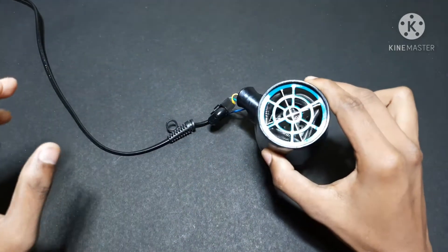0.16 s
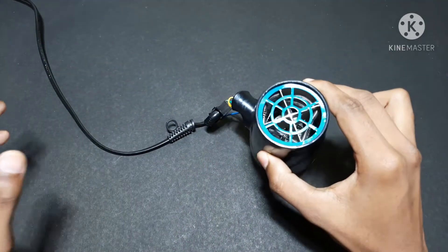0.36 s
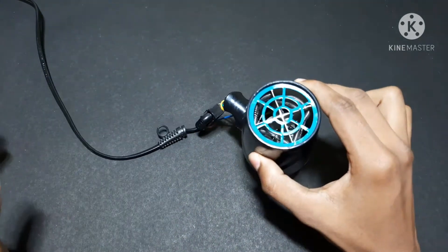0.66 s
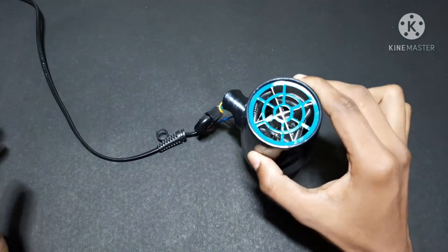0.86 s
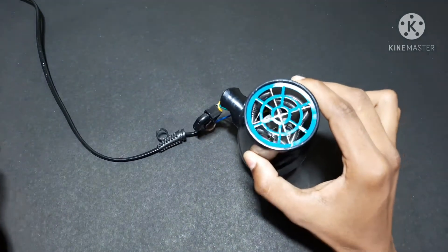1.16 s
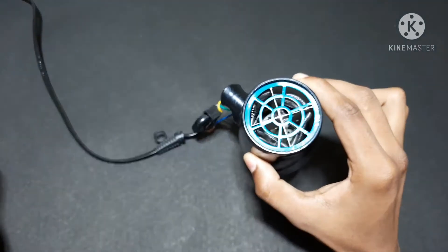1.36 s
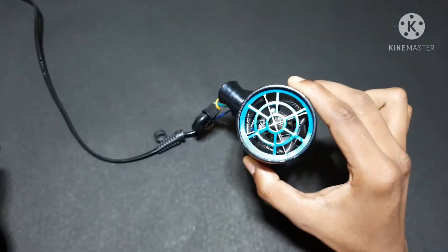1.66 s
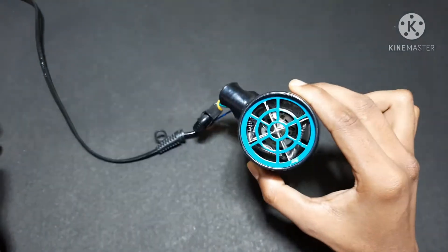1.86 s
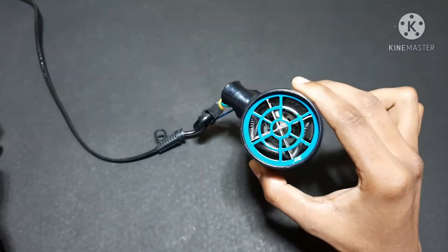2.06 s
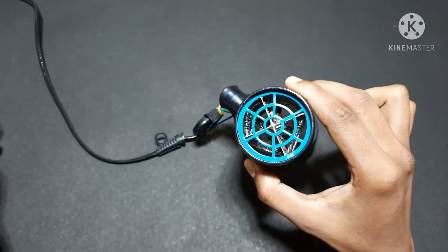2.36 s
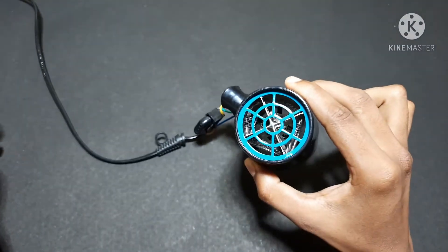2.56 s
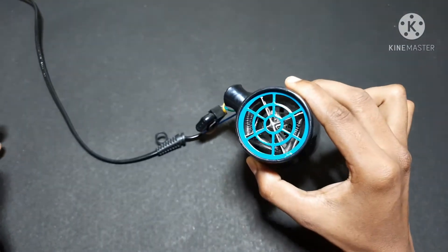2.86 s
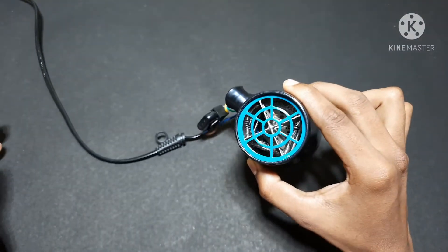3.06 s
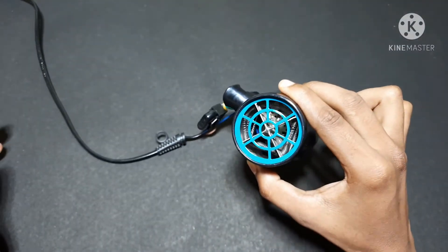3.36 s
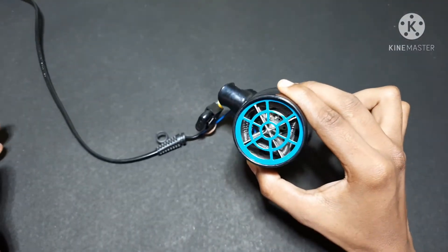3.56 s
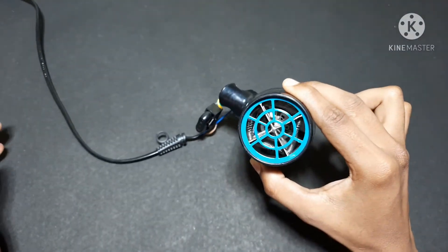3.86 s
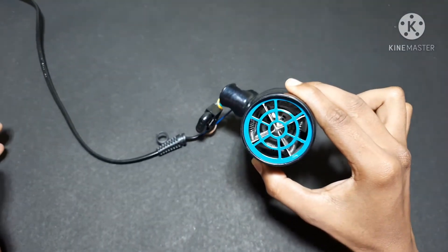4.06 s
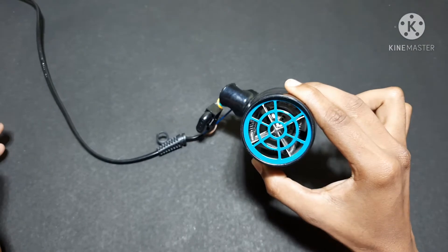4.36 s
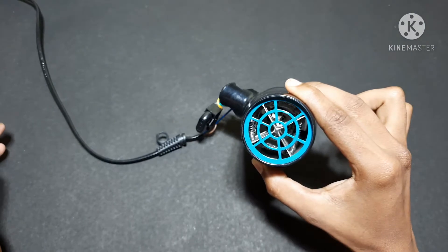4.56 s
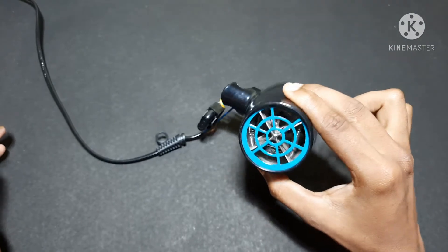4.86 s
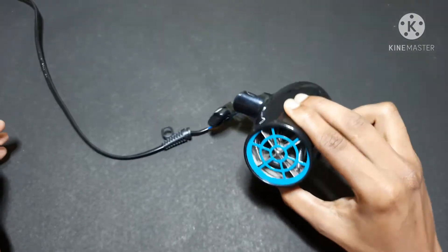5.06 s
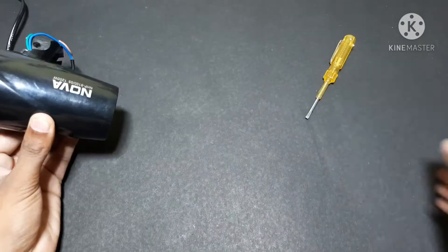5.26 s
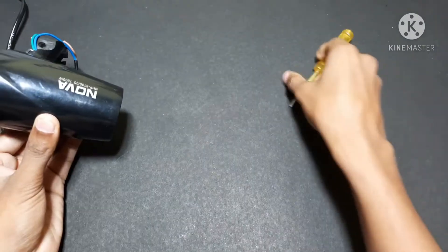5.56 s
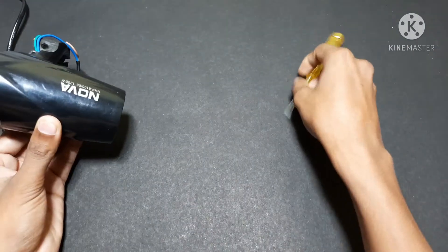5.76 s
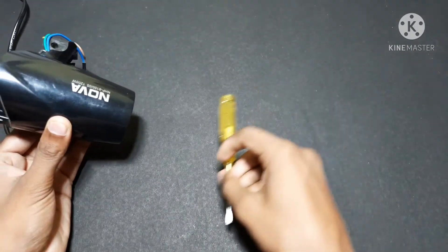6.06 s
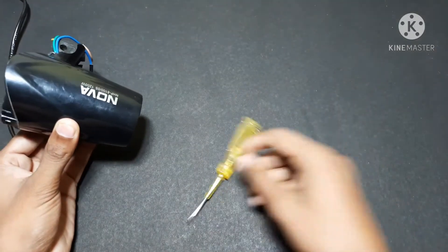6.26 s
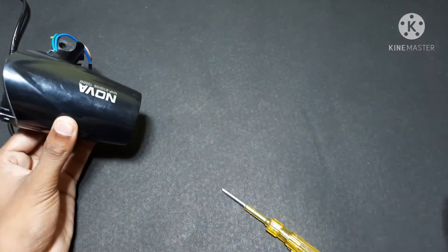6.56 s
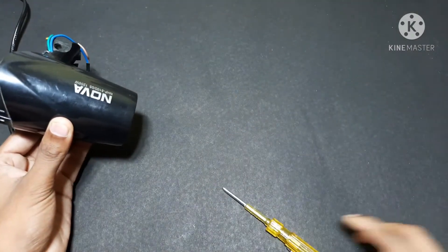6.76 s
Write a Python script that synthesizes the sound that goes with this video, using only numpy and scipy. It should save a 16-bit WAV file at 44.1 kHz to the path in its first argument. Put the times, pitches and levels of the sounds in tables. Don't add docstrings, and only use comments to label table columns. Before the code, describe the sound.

Close indoor recording of a small electric dryer: breathy, midrange-heavy fan hiss with a thin hum and whine, swelling slightly. Suddenly its air stream overloads the left microphone with deep, ragged wind buffeting, fluttering in the middle and then growing full again. It fades, the scene switches, and a louder, smooth dryer hiss continues to the end, with one small dull table tap.

```python
import sys
import numpy as np
from scipy import signal
from scipy.fft import rfft, irfft, next_fast_len
from scipy.io import wavfile
from scipy.ndimage import uniform_filter1d, minimum_filter1d, map_coordinates

SR = 44100
rng = np.random.default_rng(int(sys.argv[2]) if len(sys.argv) > 2 else 0)


def generate_wav(signal):
    frames = np.transpose(np.atleast_2d(signal))
    scaled = np.clip(frames, -1, 1) * 32767
    pcm = np.round(scaled).astype(np.int16)
    wavfile.write(sys.argv[1], SR, pcm)


def boost_factor(decibels):
    exponent = np.asarray(decibels, float) / 20
    return 10 ** exponent


N = 304731

CUT_S = 5.177
SHAFT_HZ = 342.3
FULL_SPEED_DB, SPEED_PER_DB, SLOWEST = -15.5, 0.0457, -0.9
SWING_HZ, SWING_SPREAD, SWING_DB = 235, 0.24, -3.5

# (time [s], level [dB])
UPRIGHT_HISS = [(0, -36), (0.3, -34), (1.15, -34.5), (1.3, -32), (1.6, -29), (1.675, -30), (1.7, -36.5),
                (1.8, -43.5), (1.9, -44), (2.33, -46.5), (2.42, -42.5), (3, -41.5), (3.55, -41.5),
                (3.7, -45), (4, -45), (4.8, -43), (4.9, -46.5), (5.08, -40.5)]
# (time [s], level [dB], left port turn [dB], casing roar [dB])
SIDEWAYS_HISS = [
    (5.18, -27.5, 1.5, -0.5),
    (5.252, -27, -0.5, 1),
    (6.91, -27.5, 0, 1.5),
]
# (time [s], left port turn [dB], casing roar [dB], right port draught over hiss [dB])
TILT = [
    (0, -1.2, 1, -26),
    (1.6, -1, 4.5, -29),
    (3.3, -1, 4.5, -32),
    (4, -3.5, 5, -26),
    (4.7, -3.5, 4.5, -5),
    (5.1, -0.7, 4, -22),
]
# (frequency [Hz], density [dB per Hz])
UP_LEFT = [(30, -24), (48, -4), (60, -5.5), (166, -24), (330, -14), (440, -16), (670, -18), (1330, -1.5),
           (1810, -7), (2480, -4), (5190, -10), (7640, -8), (10450, -17.5), (15400, -21)]
# (frequency [Hz], density [dB per Hz])
UP_RIGHT = [(30, -36), (53, -36), (97, -46), (151, -30), (292, -17), (430, -19), (630, -14.5), (1290, 0),
            (1700, -9), (2480, -4), (3940, -9.5), (6750, -13), (11700, -13.5), (15400, -14.5)]
# (frequency [Hz], density [dB per Hz])
SIDE_LEFT = [(30, -58), (91, -21), (147, -29.5), (296, -11), (500, -16), (680, -13), (800, -10), (1110, 2),
             (2130, -7.5), (2740, -9), (5590, -12.5), (7940, -12.5), (10720, -19.5), (15400, -24.5)]
# (frequency [Hz], density [dB per Hz])
SIDE_RIGHT = [(30, -29), (42, -42), (96, -16), (112, -32), (152, -28.5), (310, -6.5), (410, -10.5),
              (630, -9), (1160, -1.5), (2110, -6.5), (2850, -9), (6500, -16.5), (11700, -16),
              (15400, -19.5)]
# (frequency [Hz], width [Hz], gain [dB])
UP_LEFT_RINGS = [(387, 25, -10), (920, 100, 5.5), (1000, 29, -5), (1163, 68, 8), (1478, 50, 12.5),
                 (1650, 72, -8), (1930, 160, 0.5), (2480, 120, 8), (3120, 91, 4), (3020, 60, -10),
                 (3550, 360, -4), (5750, 720, -3.5), (8200, 630, 5), (8740, 470, 4), (10002, 400, -15),
                 (10600, 400, -4)]
# (frequency [Hz], width [Hz], gain [dB])
UP_RIGHT_RINGS = [(613, 40, -14), (790, 170, -5), (950, 23, 9.5), (1030, 150, -14), (1266, 73, 6.5),
                  (1380, 94, 8), (1550, 36, -8), (1754, 400, 2), (2030, 100, 2), (2583, 60, 9),
                  (2680, 41, -8), (3105, 115, 3.5), (3470, 280, -5.5), (4930, 330, 4.5), (6600, 510, -14),
                  (12000, 400, 5)]
# (frequency [Hz], width [Hz], gain [dB])
SIDE_LEFT_RINGS = [(896, 62, -14), (982, 106, 6.5), (1170, 210, 0.5), (1355, 48, -20), (1366, 44, 3),
                   (1470, 32, 0), (1712, 41, 7.5), (2300, 210, 0), (2650, 110, 9.5), (2900, 140, 7),
                   (3130, 240, -1.5), (3900, 400, -4), (4736, 150, 6), (7934, 400, 5), (8580, 530, 6.5),
                   (10389, 710, -14)]
# (frequency [Hz], width [Hz], gain [dB])
SIDE_RIGHT_RINGS = [(364, 57, -35), (640, 190, -9), (930, 56, -17), (950, 21, 17), (1050, 50, 11.5),
                    (1150, 25, -6), (1240, 32, 9), (1375, 25, 8), (1464, 100, -5), (1640, 160, -7),
                    (2220, 260, -1.5), (2970, 160, 2.5), (3359, 260, -3), (4015, 320, 3.5), (5800, 260, -3),
                    (8100, 400, 3)]
# (frequency [Hz], likeness [0-1])
UP_ALIKE = [(100, 0.46), (300, 0.97), (900, 0.71), (1300, 0.77), (2200, 0.6), (3500, 0.55), (9000, 0.14)]
# (frequency [Hz], likeness [0-1])
SIDE_ALIKE = [(100, 0.9), (300, 0.9), (1300, 0.84), (2000, 0.7), (3000, 0.1), (9000, 0)]
# (frequency [Hz], lead [rad])
UP_LEAD = [(300, .3), (1100, -.3), (3200, .8), (7200, 1.7), (15000, 3)]
# (frequency [Hz], lead [rad])
SIDE_LEAD = [(60, .1), (340, .9), (690, 1.1), (1300, 2.1), (2070, 3.9), (3200, 5.6), (7000, 8), (15000, 11)]
# (multiple of shaft rate [1], left [dB], right [dB])
UP_ORDERS = [(1, -10, -27), (3, -15, -22), (5, -13, -19), (6, -6, -6), (12, -27, -27), (24, -26, -30)]
# (multiple of shaft rate [1], left [dB], right [dB])
SIDE_ORDERS = [(1, -15, -16), (6, -6, -14), (12, -27, -29), (24, -26, -32)]
# (time [s], buffet level [dB])
JET_AIM = [(0, -29), (.03, -24), (.05, -32), (.122, -42), (.216, -44), (.3, -62), (1.1, -66.5), (1.5, -41),
           (1.676, -33), (1.684, -15), (2.3, -15.5), (2.6, -19), (3.44, -21), (3.6, -15), (4.96, -16),
           (5.05, -22), (5.065, -29), (5.15, -50)]
# (middle [s], length [s], depth [dB])
MISSES = [(2.622, 0.038, -7), (2.673, 0.031, -6), (2.754, 0.052, -10), (2.907, .035, -15), (2.96, .05, -4),
          (3.024, 0.038, -13), (3.078, 0.062, -13), (3.13, .05, -9), (3.233, .04, -14), (3.295, 0.052, -8),
          (3.359, .06, -13), (3.411, 0.079, -6), (3.47, .05, -3), (4.995, 0.042, -8)]
# (middle [s], length [s], log air speed [1])
SURGES = [
    (1.7, .2, -.25),
    (3.77, .55, .25),
]
# (frequency [Hz], density [dB per Hz])
EDDIES = [(30, -15), (67, -3.5), (102, 1), (153, -4.5), (233, 1), (530, -10), (1140, -23.5), (3320, -47.5),
          (5000, -47)]
# (time [s], peak level [dB], frequency [Hz], length [turns])
POPS = [(.004, -23, 96, 1.2), (.0235, -9.5, 301, 1.9), (.0272, -22, 640, 2.3), (.064, -23.5, 107, 2.3),
        (.125, -35, 89, 2.3), (.197, -34, 212, 2.8), (1.615, -7, 191, 1.17), (1.635, -8, 179, 1.24),
        (1.682, -15, 239, 0.77), (2.649, -10, 263, 0.77), (3.449, -10.5, 420.4, 1.16),
        (5.043, -17, 190, 1.26), (5.09, -23, 201, 1.1)]
# (time [s], peak level [dB], frequency [Hz])
PUFFS = [(2.537, -17, 244), (2.568, -16, 220), (2.636, -4, 229), (2.768, -8.5, 190), (2.912, -7.5, 214),
         (3.032, -9, 222.7), (3.105, -20, 237.6), (3.235, -21, 186.7), (3.314, -14, 210), (3.369, -21, 208),
         (3.444, -17, 122.4), (3.444, -16, 238.7)]
# (time [s], snap peak level [dB])
BURSTS = [(1.688, -15), (1.711, -9), (1.977, -6), (2.004, -14), (2.078, -6), (2.2, -11), (2.241, -4),
          (2.28, -18), (2.339, -14), (2.413, -14), (2.568, -13), (2.685, -10), (2.711, -14), (2.856, -13),
          (2.882, -12), (2.92, -14.5), (2.982, -14), (3.151, -18), (3.448, -13.5), (3.5, -14),
          (3.587, -7.5), (3.881, -13), (3.918, -6), (4.109, -22), (4.369, -19), (4.416, -15), (4.452, -14),
          (4.493, -19), (4.716, -11), (4.95, -26)]
# (time [s], peak level [dB], frequency [Hz])
TOOL = [
    (6.2, -38, 70),
    (6.211, -34, 121),
    (6.218, -22, 360),
    (6.23, -28, 162),
    (6.275, -36, 100),
]


def dryer():
    up = fan(curves(UPRIGHT_HISS) + curves(TILT)[:2], (UP_LEFT, UP_RIGHT), (UP_LEFT_RINGS, UP_RIGHT_RINGS),
             UP_ALIKE, UP_LEAD, UP_ORDERS, ports_db=[[5.5], [2.2]], patchy_db=1.5)
    side = fan(curves(SIDEWAYS_HISS), (SIDE_LEFT, SIDE_RIGHT), (SIDE_LEFT_RINGS, SIDE_RIGHT_RINGS),
               SIDE_ALIKE, SIDE_LEAD, SIDE_ORDERS, ports_db=[[5.5], [1.5]], patchy_db=1.25)
    return np.where(np.arange(N) < CUT_S * SR, up, side)


def fan(controls, ports, rings, alike, lead, orders, ports_db, patchy_db):
    hiss_db, turn_db, roar_db = controls
    shared, own = patchy_noise(patchy_db)

    def share(hz):
        return np.clip(along(alike, hz), 0, 1)

    def colour(hz):
        gains = []
        for port, modes in zip(ports, rings):
            ringing = sum(db / (1 + (2 * (hz - c) / width) ** 2) ** 1.56 for c, width, db in modes)
            gains.append(boost_factor(along(port, hz) + ringing))
        return np.array(gains)

    left = filtered(shared, lambda hz: share(hz) * np.exp(1j * along(lead, hz)))
    left = left + filtered(own, lambda hz: np.sqrt(1 - share(hz) ** 2))
    both = np.array([unit(left), unit(shared)])
    air = filtered(both, lambda hz: colour(hz) * echoes(hz, t60=0.09, wet_db=-11))
    hiss = filtered(air, lambda hz: 1 / (1 + (1900 / (hz + 1)) ** 6))
    roar = air - hiss
    air = (hiss + boost_factor(roar_db) * roar) / np.std(hiss[1])
    lines = shaft_lines(orders, lead)
    return (air * boost_factor(ports_db) + lines) * boost_factor(hiss_db + np.array([turn_db, 0 * turn_db]) + 0.09 * wobble(8))


def patchy_noise(patchy_db):
    z = signal.stft(rng.standard_normal((2, N + 512)), nperseg=512)[2]
    field = uniform_filter1d(rng.standard_normal(z.shape[1:]), size=2, axis=0)
    field = uniform_filter1d(field, size=22, axis=1)
    return signal.istft(z * boost_factor(patchy_db * unit(field)), nperseg=512)[1][:, :N]


def shaft_lines(orders, lead):
    rate = SHAFT_HZ * (1 + 0.0015 * wobble(4) + 0.002 * wobble(40))
    turn = 2 * np.pi * np.cumsum(rate) / SR
    lines = 0
    for multiple, left_db, right_db in orders:
        level = boost_factor(np.array([[left_db], [right_db]]) + 1.1 * wobble(15))
        phase = along(lead, multiple * SHAFT_HZ) * np.array([[1], [0]])
        lines = lines + level * np.sin(multiple * turn + phase)
    return lines


def echoes(hz, t60, wet_db):
    t = np.arange(4096) / SR
    decay = rng.standard_normal((2, len(t))) * boost_factor(-60 * t / t60)
    tail = np.fft.rfft(decay, 2 * len(hz) - 2)
    treble = 1 / (1 + (3400 / (hz + 1)) ** 6)
    return 1 + boost_factor(wet_db) * unit(np.abs(tail)) * np.exp(1j * np.angle(tail)) * treble


def jet():
    level_db = curves(JET_AIM)[0] + bumps(MISSES)
    speed = np.maximum(SPEED_PER_DB * (level_db - FULL_SPEED_DB), SLOWEST) + bumps(SURGES)
    left = buffet(level_db + 5.5, speed, gusty=0.25, lumpy_db=1.5, spike_db=-4.0)
    draught_db = curves(UPRIGHT_HISS)[0] + curves(TILT)[2] - 2.5
    right = buffet(draught_db, np.full(N, -0.9), gusty=0.2, lumpy_db=4.5, spike_db=1.5)
    pops = wavelets(POPS, boost_db=7.5)
    puffs = wavelets([(*puff, 1.8) for puff in PUFFS], boost_db=3.0)
    return np.array([left + pops + puffs + sharp_eddies(), right]) * (np.arange(N) < CUT_S * SR)


def buffet(level_db, speed, gusty, lumpy_db, spike_db):
    jerk = 0.8 * wobble(220) + 0.55 * wobble(80) + 0.2 * wobble(30)
    jerk = 1.5 * np.tanh(jerk / 1.5)
    pattern = unit(filtered(rng.standard_normal(2 * N), lambda hz: boost_factor(along(EDDIES + [(9000, -90)], hz))))
    place = np.cumsum(np.exp(np.clip(gusty * jerk + speed, -2, 1.2)))
    swing = map_coordinates(pattern, [place], order=1)
    bursts = spikes(speed, count=1100, hz=330, spread_db=2.6)
    bursts = filtered(bursts, lambda hz: 1 / (1 + (hz / 2100) ** 3))
    burst_db = spike_db + 0.5 * np.clip(level_db + 11.0, -14, 0)
    return boost_factor(level_db) * unit(unit(swing * boost_factor(lumpy_db * jerk)) + boost_factor(burst_db) * bursts)


def spikes(speed, count, hz, spread_db):
    draw = rng.random((count, 4))
    at = (draw[:, 0] * N).astype(int)
    width = SR / (2 * np.pi * hz * np.exp(speed[at] + 1.68 * (draw[:, 1] - 0.5)))
    lag = np.arange(-200, 200)
    u = np.abs(lag) / width[:, None]
    sign = np.where(draw[:, 3] < 0.6, 1, -1)
    size = boost_factor(-spread_db * np.log(draw[:, 2])) * sign
    pulses = size[:, None] * (1 - u) * np.exp(-u)
    where = at[:, None] + lag + 200
    return unit(np.bincount(where.ravel(), pulses.ravel(), N + 400)[200:N + 200])


def sharp_eddies():
    pitches = SWING_HZ * np.exp(SWING_SPREAD * rng.standard_normal(len(BURSTS)))
    eddies = [(s, db, hz) for (s, db), hz in zip(BURSTS, pitches)]
    swings = wavelets([(s, db + SWING_DB, hz, 1.2) for s, db, hz in eddies], boost_db=6.0)
    snaps = wavelets([(s, db, 3.24 * hz, 1.1) for s, db, hz in eddies], boost_db=6.5)
    return swings + filtered(snaps, lambda hz: 1 / (1 + (hz / 2200) ** 3))


def tool():
    return wavelets([(*knock, 2.5) for knock in TOOL], boost_db=-2.0)


def wavelets(events, boost_db):
    out, t = np.zeros(N + SR), np.arange(2000) / SR
    for s, db, hz, turns in events:
        envelope = np.sin(np.pi * np.minimum(t * hz / turns, 1))
        out[round(s * SR):][:len(t)] += boost_factor(db + boost_db) * envelope * np.sin(2 * np.pi * hz * t)
    return out[:N]


def bumps(rows):
    t = np.arange(N) / SR
    return sum(height * np.cos(np.pi * np.clip((t - s) / length, -0.5, 0.5)) ** 2 for s, length, height in rows)


def curves(rows):
    s, *columns = np.transpose(rows)
    return [np.interp(np.arange(N) / SR, s, column) for column in columns]


def wobble(rate):
    knots = rng.standard_normal(int(N * rate / SR) + 4)
    return map_coordinates(knots, [np.arange(N) * rate / SR])


def along(points, hz):
    f, v = np.transpose(points)
    return np.interp(np.log(hz + 1), np.log(f + 1), v)


def filtered(x, response):
    m = next_fast_len(x.shape[-1] + 8192)
    return irfft(rfft(x, m) * response(np.fft.rfftfreq(m, 1 / SR)), m)[..., :x.shape[-1]]


def unit(x):
    return x / np.sqrt(np.mean(x ** 2) + 1e-20)


def scene():
    return dryer() + jet() + tool()


def roll_off(x):
    return signal.sosfilt(signal.butter(12, 15490, fs=SR, output="sos"), x)


def record(dry):
    x = filtered(dry, lambda hz: 1 / np.sqrt(1 + (52 / (hz + 1)) ** 8) / np.sqrt(1 + (hz / 15350) ** 40))
    need = np.minimum(1, 1.4 / (np.abs(x).max(0) + 1e-9))
    x = x * uniform_filter1d(minimum_filter1d(need, size=900), size=600)
    mix = x / (1 + np.abs(x / 1.08) ** 5) ** (1 / 5)
    return roll_off(mix)


dry = scene()
out = record(dry)
generate_wav(out)
```